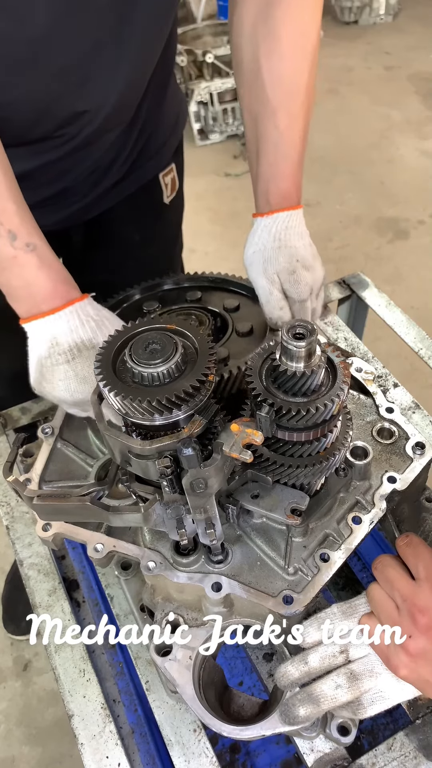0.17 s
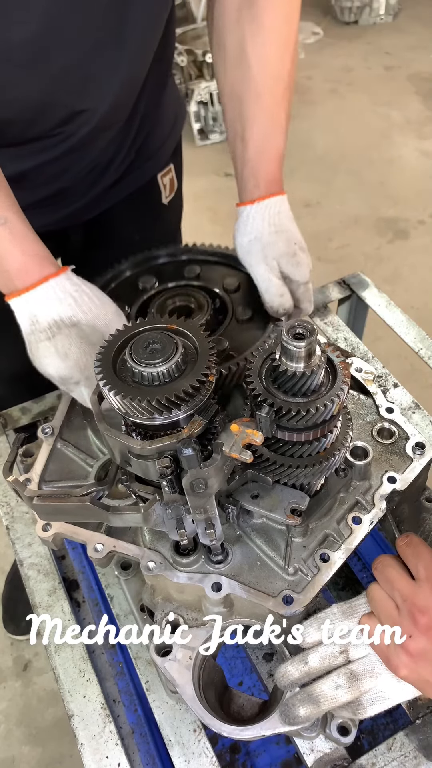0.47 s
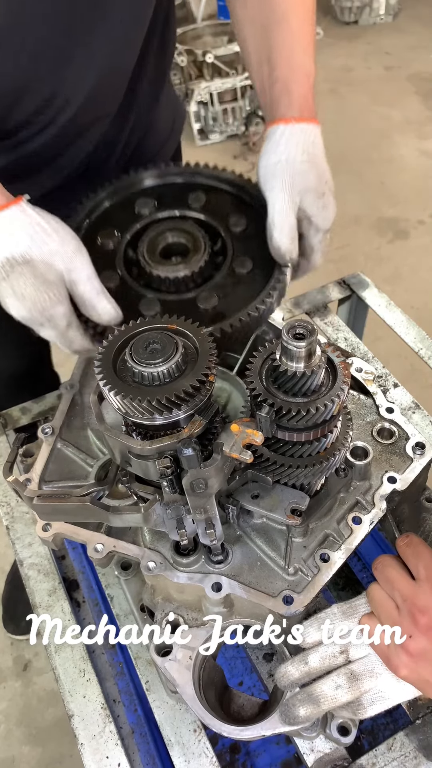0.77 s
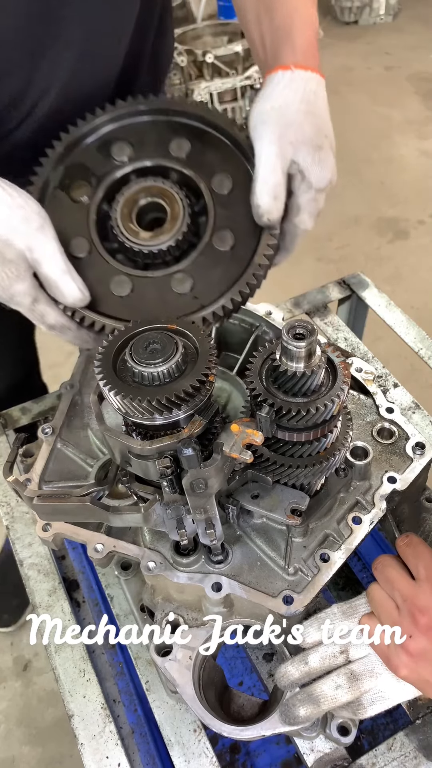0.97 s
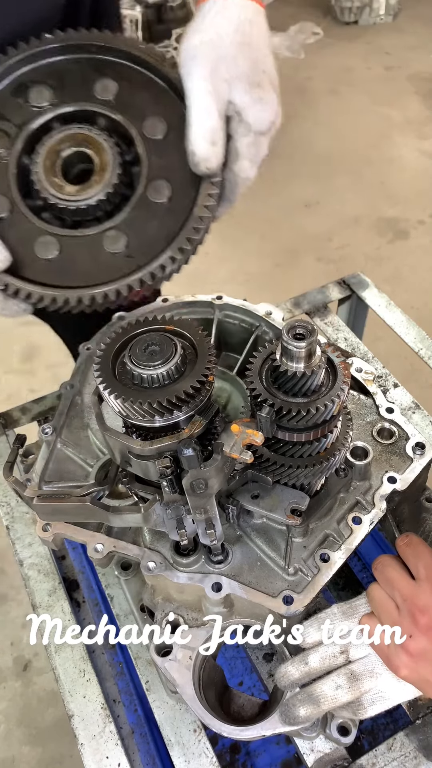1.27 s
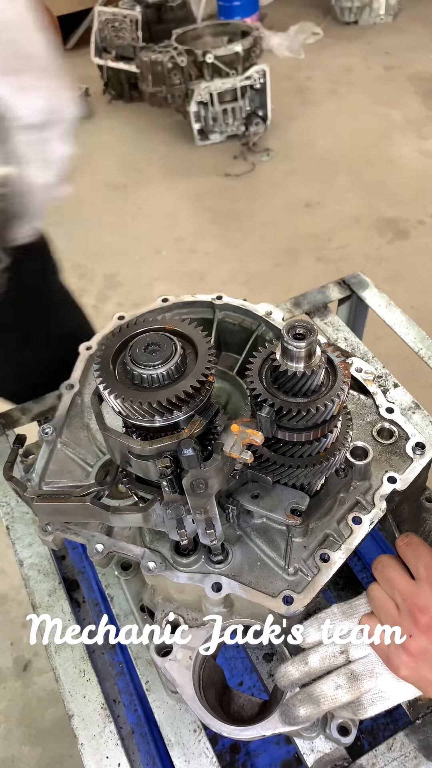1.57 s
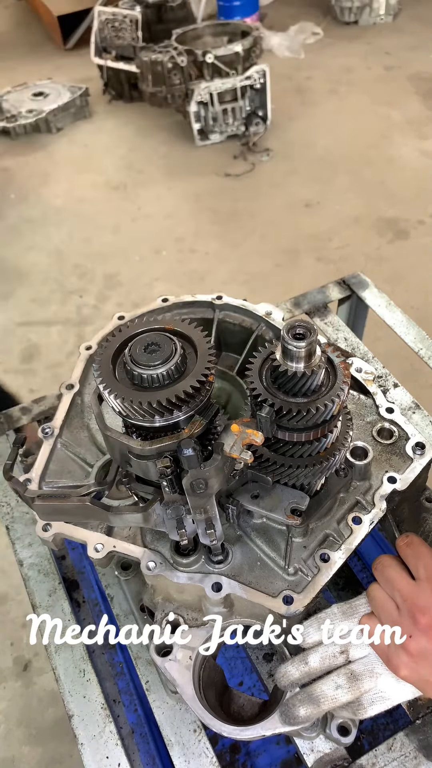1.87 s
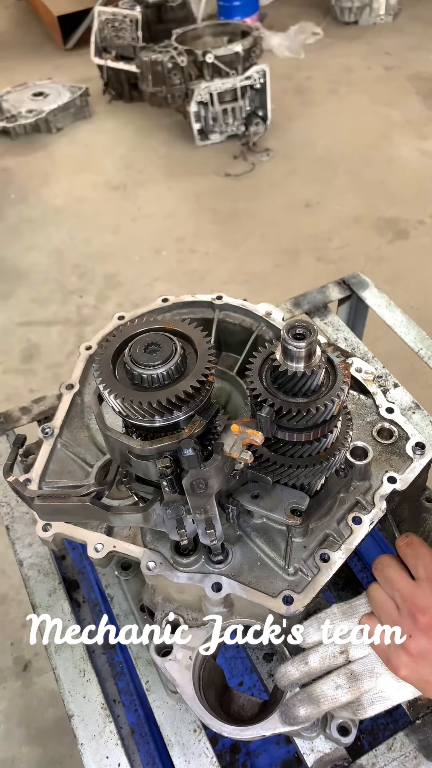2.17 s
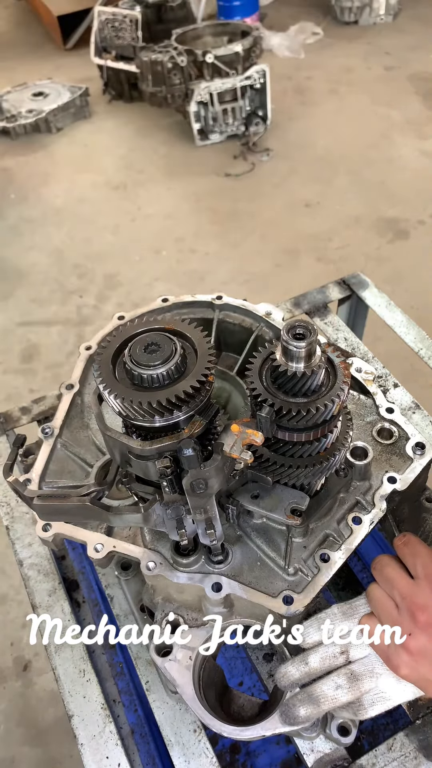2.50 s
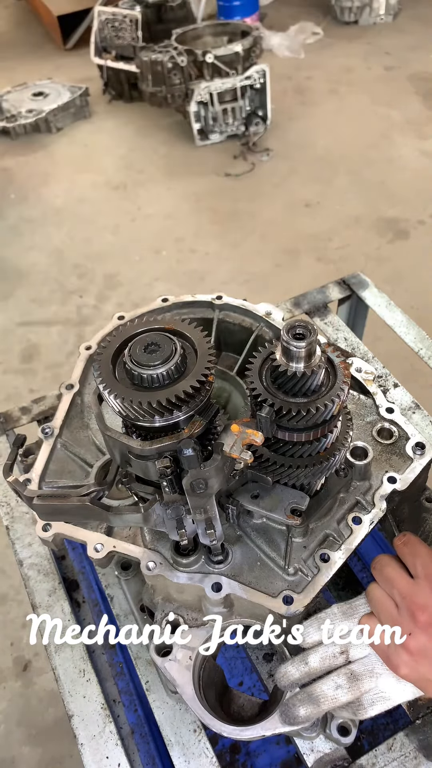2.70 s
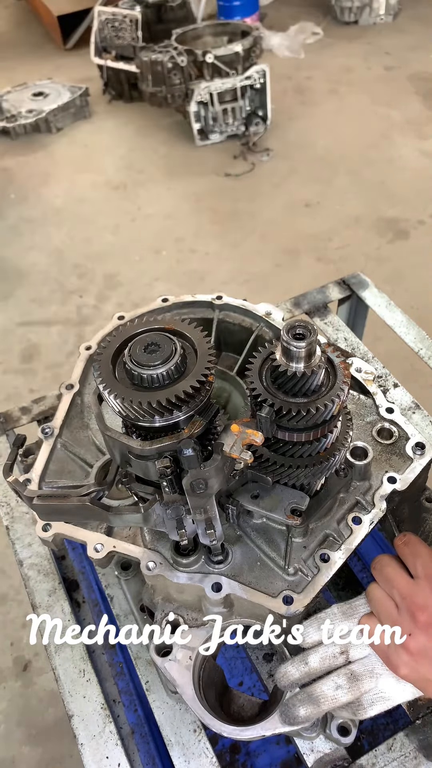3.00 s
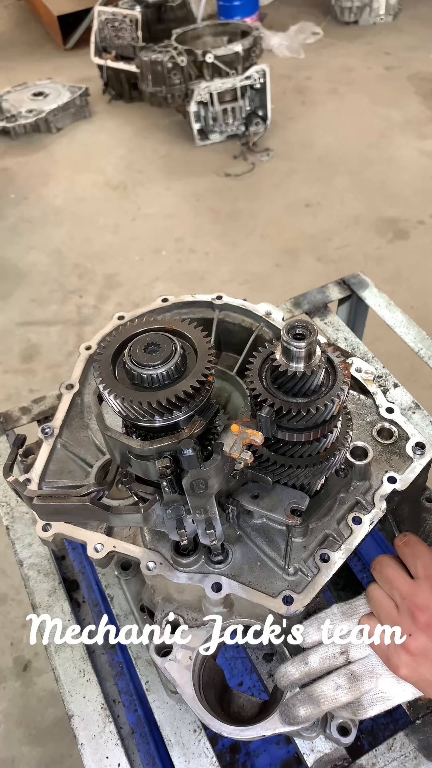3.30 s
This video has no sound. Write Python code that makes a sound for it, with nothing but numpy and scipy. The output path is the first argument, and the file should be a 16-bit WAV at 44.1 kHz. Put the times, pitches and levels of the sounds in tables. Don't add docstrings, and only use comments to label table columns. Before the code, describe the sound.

A large steel gear grinds dully out of a gearbox case and clinks twice, jolting the case; shoes scuff and squeak on concrete, then a loud heavy metal crash booms further off in a reverberant workshop, in stereo.

```python
import sys
import numpy as np
from scipy import signal
from scipy.fft import rfft, irfft
from scipy.io import wavfile

SR = 44100
rng = np.random.default_rng(int(sys.argv[2]) if len(sys.argv) > 2 else 0)


def dump(signal):
    limited = np.clip(np.atleast_2d(signal).T, -1, 1)
    pcm = np.round(limited * 32767).astype(np.int16)
    wavfile.write(sys.argv[1], SR, pcm)


def convert_level_to_amplitude(level_db):
    exponent = np.asarray(level_db, float) / 20
    return 10 ** exponent


N = 152145

# (time [s], level [dB])
GRIND_LEVEL = [
    (0, -39.5),
    (.09, -44.5),
    (.14, -36),
    (.19, -44.5),
    (.25, -37),
    (.33, -41),
    (.42, -45),
    (.5, -56),
]
# (frequency [Hz], width [Hz], level [dB])
GRIND_RESONANCES = [(134.3, 13, 0), (269, 76, 4.5), (353, 69, 1.5), (435, 61, 4.5), (590, 720, -13)]
# (frequency [Hz], level [dB per Hz])
HUM_SPECTRUM = [(15, -35), (30, 1), (65, 4), (120, -5.5), (300, -18), (600, -25.5), (3000, -45.5),
                (14000, -64)]
# (time [s], level [dB])
RUSTLE_LEVEL = [(0, -52.5), (.12, -58.5), (.5, -62.5), (.75, -61), (1.0, -55.5), (1.5, -60), (2.0, -79),
                (2.4, -69)]
# (frequency [Hz], level [dB per Hz])
RUSTLE_SPECTRUM = [(500, -40), (1200, -0.5), (2500, -8), (4000, -12.5), (4800, -21.5), (8000, -34),
                   (14000, -41.5)]
# (frequency [Hz], T60 [s])
HALL_DECAY = [(100, 2.06), (500, 1.76), (2000, 1.187), (8000, 0.52)]
# (frequency [Hz], likeness [-1 to 1])
FAR_LIKENESS = [(60, 0.87), (180, 0.93), (300, 0.69), (600, 0.21), (1300, 0.094)]

# (time [s], attack [s], hold [s], level [dB], brightness [dB])
SCUFF_EVENTS = [
    (0.262, 0.027, 0.016, -68, 13),
    (1.666, 0.038, 0.21, -48.5, 2),
    (2.502, 0.14, 0.093, -57, 13.5),
    (2.913, 0.033, 0.0265, -41, 10),
    (3.118, 0.011, 0.009, -47, 3),
    (3.273, 0.03, 0.13, -49, 2.5),
    (3.347, 0.2, .1, -47, 22),
]
# (frequency [Hz], level [dB per Hz])
SCUFF_SPECTRUM = [(350, -20), (700, -1.5), (2000, 0.5), (3800, -2), (4900, -4), (7000, -8.5), (11000, -26),
                  (14000, -28.5)]
# (time [s], peak [dB], frequency [Hz], crack level [dB])
TICK_EVENTS = [
    (1.728, -45.5, 375, -6),
    (2.431, -51.5, 2400, -36),
    (2.602, -35, 2780, -12.5),
    (2.638, -32, 3100, -9),
]

# (time [s], strength [dB])
FIRST_CONTACTS = [
    (.5548, -44),
    (.5565, -20),
    (.5585, -24.5),
    (.5602, -30),
]
SECOND_CONTACTS = [
    (1.0665, -42.5),
    (1.0705, -35.5),
    (1.0716, -17),
    (1.0738, -48),
]
# (frequency [Hz], level [dB], T60 [s])
FIRST_GEAR_MODES = [(265, -11, 0.05), (403, -21, 0.14), (646, -14, 0.015), (733, -1, 0.018),
                    (1180, -2.5, 0.038), (1580, -17, 0.064), (1740, 6.5, 0.011), (1880, -13.5, 0.073),
                    (2420, -20.5, 0.086), (3400, -7, 0.051), (3715, -2, 0.072)]
SECOND_GEAR_MODES = [(875, 2, 0.015), (1110, 5.5, 0.012), (1402, -10, 0.059), (1837, 3, 0.017),
                     (2044, 7, 0.015), (2295, 10, 0.0091), (2720, -13, 0.022), (3520, -11, 0.055),
                     (6910, -5.5, 0.019)]
# (frequency [Hz], level [dB], T60 [s])
FIRST_RIM_MODES = [(3760, -37, 0.28), (2380, -29, 0.19)]
SECOND_RIM_MODES = [(1875, -25.5, 0.78), (1930, -26, 0.55), (2284, -32, .3), (3600, -35, 0.79),
                    (3870, -40.5, 0.38), (6830, -44, 0.46), (6300, -48, 0.44)]
# (frequency [Hz], lead [rad])
FIRST_LEAD = [(0, 0), (2240, 0.8), (2840, -3.2), (5510, 4.6), (12600, 12.9), (13800, 12.2)]
SECOND_LEAD = [(0, 0), (2930, 1.4), (3450, 5.8), (5860, 11.7), (8100, 13.3), (8530, 14.7), (13000, 19.4),
               (13800, 21.2)]
# (frequency [Hz], level [dB], T60 [s])
CASE_MODES = [(137, -15, .3), (208, -13, .2), (258, -12.5, 0.4), (302.4, 0.5, 0.086), (332.5, -1.5, 0.14),
              (376, -12, 0.17), (445, 1.5, 0.036), (511, -18, 0.27), (588, -15.5, 0.08)]
# (time [s], level [dB])
FIRST_JOLT_HITS = [
    (.560, -38),
    (.584, -46.5),
]
# (time [s], level [dB])
SETTLING_HITS = [
    (1.255, -33.5),
    (1.288, -33.5),
]
# (time [s], level [dB])
CRACK_HITS = [
    (.5565, -36.5),
    (1.0703, -30),
]
# (frequency [Hz], level [dB per Hz])
CRACK_SPECTRUM = [(500, -10), (1500, 5.5), (3000, -6.5), (5000, -6.5), (7500, -3), (9500, -28),
                  (12000, -14.5), (14000, -27)]
# (time [s], level [dB])
ECHO_HITS = [
    (.563, -40),
    (1.079, -36),
]
# (frequency [Hz], level [dB per Hz])
ECHO_SPECTRUM = [(400, 14.5), (1000, 9.5), (2500, 3.5), (3700, -3.5), (4700, -13.5), (7000, -23),
                 (12000, -50.5)]

# (time [s], frequency [Hz], level [dB])
SQUEAL_GLIDE = [
    (1.87, 913, -102),
    (1.91, 888, -53.5),
    (1.95, 854, -47),
    (2.0, 777, -63.5),
    (2.1, 760, -72),
]

# (frequency [Hz], level [dB per Hz])
CRASH_SPECTRUM = [(59, -33), (100, -9), (270, -10), (408, -17.5), (491, -14), (952, -24), (2220, -25.5),
                  (6930, -38), (14000, -58)]
# (time [s], strength [dB])
LANDING_HITS = [
    (2.681, -29),
    (2.691, -19.5),
    (2.6995, -30.5),
    (2.7036, -28),
    (2.713, -33),
    (2.731, -29),
    (2.747, -41),
    (2.932, -39),
]
# (frequency [Hz], level [dB], T60 [s])
SHEET_MODES = [(1284, -3.5, 0.078), (1343, -14, .08), (1737, -1.5, 0.077), (1980, -6, 0.14),
               (2071, -3, 0.094), (2280, -1, 0.07), (2500, -11, .06), (2970, -12, 0.028),
               (3610, -15, 0.032), (6930, -6.5, 0.035)]
# (frequency [Hz], lead [rad])
LANDING_PHASE = [(0, 0), (1200, 1.6), (2000, 2.2), (3000, 1.2), (7000, 1.8)]
# (time [s], level [dB])
SPRAY_HITS = [
    (2.670, -50),
    (2.678, -30),
    (2.69, -40),
    (2.703, -36),
    (2.72, -45),
]
# (frequency [Hz], level [dB per Hz])
SPRAY_SPECTRUM = [(2500, -15), (6500, 1.5), (9000, 1), (12000, -6), (14000, -14)]
# (frequency [Hz], level [dB], T60 [s])
BENCH_MODES = [(76.4, -12.5, 1.17), (79.9, -17.5, 1.8), (90.3, -30.5, 6.5), (172, -26, 0.51),
               (202.4, -20, 0.54), (235.3, -22.5, 0.31), (264.6, -20, 0.27), (317, -34.5, 0.15),
               (491.6, -29, 0.28), (654, -33, 0.4), (786, -28.5, 0.47)]
FRAME_MODES = [(108.7, -32.5, 2.1), (135.5, -33, 1.6), (160, -27, 1.3), (195, -23, 0.96)]

# (frequency [Hz], left minus right [dB])
PORT_TILT = [(60, 0.5), (230, -4), (900, -1.5), (3510, 0), (13600, 1)]
# (frequency [Hz], gain [dB])
SIDE_SPECTRUM = [(300, -0.5), (900, 0.5), (5500, 1.5), (7200, -9), (8500, 0.5), (11000, 2.5), (12800, -21),
                 (14000, 5.5)]


def in_time(rows):
    s, *columns = np.transpose(rows)
    return [np.interp(np.arange(N) / SR, s, c) for c in columns]


def at_hz(points, hz):
    table_hz, value = np.transpose(points)
    return np.interp(np.log(hz), np.log(table_hz), value)


def spectrum_hz():
    return np.arange(N // 2 + 1) * SR / N + 1


def rms_one(x):
    return x / np.sqrt(np.mean(x ** 2) + 1e-20)


def filtered(x, order, cut_hz, kind):
    return signal.sosfilt(signal.butter(order, cut_hz, kind, fs=SR, output="sos"), x)


def drift(rate_hz):
    step = 40
    r = np.exp(-2 * np.pi * step * rate_hz / SR)
    white = rng.standard_normal(N // step + 2002)
    slow = signal.lfilter([1], [1, -2 * r, r * r], white)[2000:]
    return np.interp(np.arange(N) / step, np.arange(len(slow)), rms_one(slow))


def bands(gain):
    edges = 22 * 2 ** np.arange(0, 9.6, .5)
    white = rng.standard_normal((2, 2, N))
    out = 0
    for k, (low, high) in enumerate(zip(edges, edges[1:])):
        out = out + gain(np.sqrt(low * high)) * filtered(white[k % 2], 2, [low, high], "band")
    alike = np.clip(at_hz(FAR_LIKENESS, spectrum_hz()), -1, 1)
    mid, side = irfft(rfft(out) * np.sqrt(1 + alike * [[1], [-1]]), N)
    return np.array([mid + side, mid - side])


def colour(x, spectrum):
    hz = spectrum_hz()
    gain = convert_level_to_amplitude(at_hz(spectrum, hz)) * (hz > spectrum[0][0] / 2)
    return rms_one(irfft(rfft(x) * gain, N))


def grains(rate, spread_db, channels):
    chance, size, sign = rng.random((3, channels, N))
    return (chance < rate / SR) * convert_level_to_amplitude(-spread_db * np.log(size + .01)) * np.sign(sign - .5)


def strike(hits, modes, rise_s=0.00032, leads=((1, 0), (2, 0))):
    out = np.zeros((2, N))
    length = int(SR * min(1, 1.5 * max(t60 for _, _, t60 in modes)))
    for s, db in hits:
        i = int(s * SR)
        t = np.arange(i + 1, min(N, i + length)) / SR - s
        onset = 1 - np.exp(-t / rise_s)
        for hz, mode_db, t60 in modes:
            lead = np.interp(hz, *np.transpose(leads)) * np.array([[1.], [0]])
            decay = convert_level_to_amplitude(db + mode_db - 60 * t / t60)
            out[:, i + 1:i + 1 + len(t)] += decay * onset * np.sin(2 * np.pi * hz * t + lead)
    return out


def cracks(hits, t60, spectrum=CRACK_SPECTRUM, channels=1):
    t = np.arange(N) / SR
    envelope = sum((t > s) * convert_level_to_amplitude(db - 60 * np.maximum(t - s, 0) / t60) for s, db in hits)
    return colour(rng.standard_normal((channels, N)), spectrum) * envelope


def grinding():
    slips = filtered(grains(1100, -0.5, channels=1)[0], 2, 870, "low")
    out = 0
    for hz, width, db in GRIND_RESONANCES:
        r = np.exp(-np.pi * width / SR)
        poles = [1, -2 * r * np.cos(2 * np.pi * hz / SR), r * r]
        out = out + convert_level_to_amplitude(db) * rms_one(signal.lfilter([1], poles, slips))
    end_s = GRIND_LEVEL[-1][0] + 0.05
    level_db, = in_time(GRIND_LEVEL + [(end_s, -90)])
    return convert_level_to_amplitude(level_db) * rms_one(out)


def hum():
    noise = bands(lambda hz: convert_level_to_amplitude(at_hz(HUM_SPECTRUM, hz) + 0.5 * drift(12)))
    return convert_level_to_amplitude(-44) * rms_one(noise)


def rustle():
    level_db, = in_time(RUSTLE_LEVEL)
    noise = colour(rng.standard_normal((2, N)), RUSTLE_SPECTRUM)
    return convert_level_to_amplitude(level_db + drift(24)) * noise


def hall(x):
    gap_s = 0.018
    t = np.arange(N) / SR
    tail = bands(lambda hz: convert_level_to_amplitude(-60 * t / at_hz(HALL_DECAY, hz))) * (1 - np.exp(-t / gap_s))
    tail = tail / np.sqrt(np.sum(tail ** 2) / 2)
    return signal.fftconvolve(x[None], tail, axes=1)[:, :N]


def scuffs():
    release_s, grains_per_s, bright_hz = 0.021, 4000, 5130
    t = np.arange(N) / SR
    shapes = []
    for s, rise, hold, db, _ in SCUFF_EVENTS:
        release = np.exp(-np.maximum(t - s - rise - hold, 0) / release_s)
        shapes.append(convert_level_to_amplitude(db) * np.clip((t - s) / rise, 0, 1) * release)
    shapes = np.array(shapes)
    grit = convert_level_to_amplitude(2.0 * drift(21)) * colour(grains(grains_per_s, 3.8, channels=2), SCUFF_SPECTRUM)
    top = filtered(grit, 4, bright_hz, "high")
    extra_top = (convert_level_to_amplitude(np.array(SCUFF_EVENTS)[:, 4]) - 1) @ shapes
    return shapes.sum(axis=0) * grit + extra_top * top


def clinks():
    first = strike(FIRST_CONTACTS, FIRST_GEAR_MODES, leads=FIRST_LEAD)
    return first + strike(SECOND_CONTACTS, SECOND_GEAR_MODES, leads=SECOND_LEAD)


def rim():
    out = 0
    for touch, modes, leads in ((FIRST_CONTACTS[1:2], FIRST_RIM_MODES, FIRST_LEAD),
                                (SECOND_CONTACTS[2:3], SECOND_RIM_MODES, SECOND_LEAD)):
        for mode in modes:
            out = out + strike(touch, [mode], leads=leads) * (.3 + drift(55))
    return out


def case_jolt():
    jolt_s, jolt_db = 1.0871, -28
    hits = [(jolt_s, jolt_db - 12), (jolt_s + 0.00349, jolt_db)]
    jolt = strike(hits, CASE_MODES, rise_s=.0008) * convert_level_to_amplitude(7 * drift(9.3))
    settling = strike(SETTLING_HITS, CASE_MODES[:3], rise_s=0.0036)
    return jolt + settling + strike(FIRST_JOLT_HITS, CASE_MODES[:5], rise_s=.003)


def ticks():
    t60 = 0.015
    out = 0
    for s, db, hz, _ in TICK_EVENTS:
        out = out + strike([(s, db)], [(hz, 0, t60), (0.9 * hz, -4, t60), (1.175 * hz, -6, t60)])
    return out + cracks([(s, db + crack_db) for s, db, _, crack_db in TICK_EVENTS], t60=0.014)


def squeal():
    hz, db = in_time(SQUEAL_GLIDE)
    phase = 2 * np.pi * np.cumsum(hz * (1 + .05 * drift(60))) / SR
    return (db > -74.9) * convert_level_to_amplitude(db) * drift(70) * np.sin(phase)


def drag():
    start_s, swell_s, end_s = 2.52, .06, 2.655
    t = np.arange(N) / SR
    grit = filtered(grains(2200, 1.9, channels=2), 2, [2280, 3930], "band")
    return convert_level_to_amplitude(-51.5) * rms_one(grit) * np.clip((t - start_s) / swell_s, 0, 1) * (t < end_s)


def crash(drop_s):
    rise_s, hold_s, t60, level_db = .024, 0.019, 0.37, -15.5
    t = np.maximum(np.arange(N) / SR - drop_s, 0)
    noise = rms_one(bands(lambda hz: convert_level_to_amplitude(at_hz(CRASH_SPECTRUM, hz) + 1.5 * drift(15.4)) * (hz > 90)))
    swell = np.clip(t / rise_s, 0, 1) * convert_level_to_amplitude(level_db - 60 * np.maximum(t - rise_s - hold_s, 0) / t60)
    clang = 0
    for s, db in LANDING_HITS:
        for mode in SHEET_MODES:
            hit = (s, db + 4.25 * rng.standard_normal())
            clang = clang + strike([hit], [mode], rise_s=0.0021, leads=LANDING_PHASE)
    return swell * noise + clang + cracks(SPRAY_HITS, 0.15, SPRAY_SPECTRUM, channels=2)


def boom(drop_s):
    out = 0
    for mode in BENCH_MODES + FRAME_MODES:
        flutter_db = 5.5 * np.clip(mode[0] / 170, 0, 1)
        out = out + strike([(drop_s, 0)], [mode], rise_s=0.02) * convert_level_to_amplitude(flutter_db * drift(12))
    short_modes = [(hz, db, t60 / 2) for hz, db, t60 in BENCH_MODES[3:9]]
    return out + strike([(drop_s + .0245, -5)], short_modes, rise_s=0.0051)


def scene():
    drop_s = 2.672
    case = grinding() + case_jolt()
    feet = scuffs() + ticks() + drag()
    clink, ring, crack = clinks(), rim(), cracks(CRACK_HITS, 0.031)
    fall, bench = crash(drop_s), boom(drop_s)
    sent = convert_level_to_amplitude(-19.5) * case[0] + convert_level_to_amplitude(-25) * clink[0] + convert_level_to_amplitude(-15) * crack[0] + convert_level_to_amplitude(-8) * ring[0]
    sent = sent + convert_level_to_amplitude(-5) * feet[0] + convert_level_to_amplitude(-8) * (fall[0] + 0.038 * bench[0])
    echoes = cracks(ECHO_HITS, 0.62, ECHO_SPECTRUM, channels=2)
    direct = case + clink + crack + ring + feet + fall + bench + squeal()
    return direct + hum() + rustle() + hall(sent) + echoes


def band_limit(x):
    return signal.sosfilt(signal.butter(12, 14220, fs=SR, output="sos"), x)


def record(dry):
    low_cut_hz, top_hz = 35.4, 14250
    notch_hz, notch_width_hz, dip_hz, dip_width_hz = 9705, 1410, 5100, 500
    hz = spectrum_hz()
    tilt = convert_level_to_amplitude(at_hz(PORT_TILT, hz) * [[.5], [-.5]])
    left, right = rfft(dry) * tilt / (1 + (low_cut_hz / hz) ** 2) / 2
    notch = 1 - 0.59 / (1 + ((hz - notch_hz) / (notch_width_hz / 2)) ** 4)
    dip = 1 - 0.61 / (1 + ((hz - dip_hz) / (dip_width_hz / 2)) ** 2)
    mid = (left + right) * notch * dip * (hz < top_hz)
    side = (left - right) * convert_level_to_amplitude(at_hz(SIDE_SPECTRUM, hz))
    return band_limit(irfft([mid + side, mid - side], N))


dry = scene()
out = record(dry)
dump(out)
```